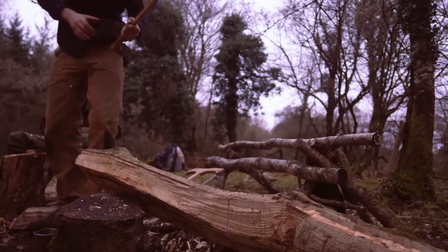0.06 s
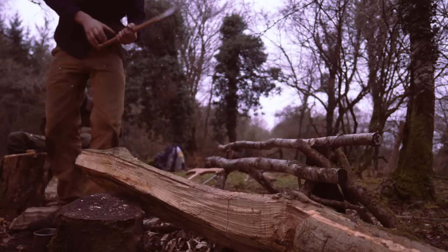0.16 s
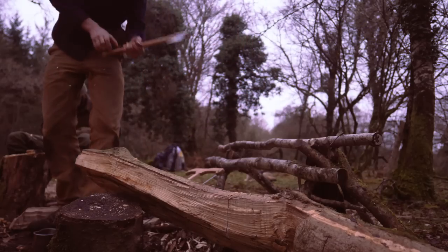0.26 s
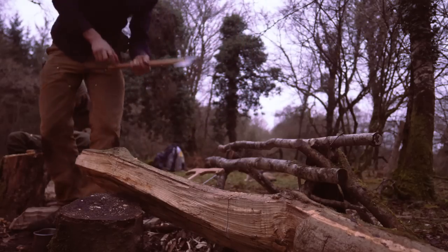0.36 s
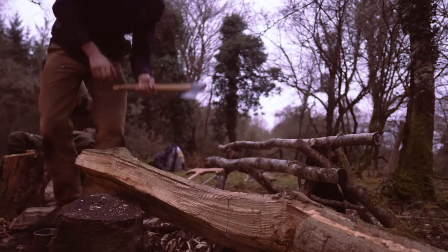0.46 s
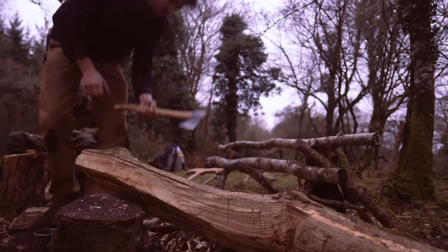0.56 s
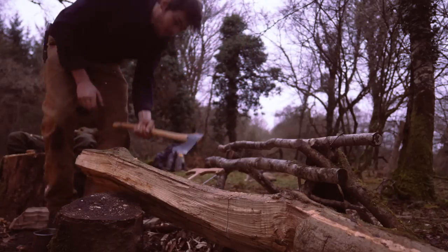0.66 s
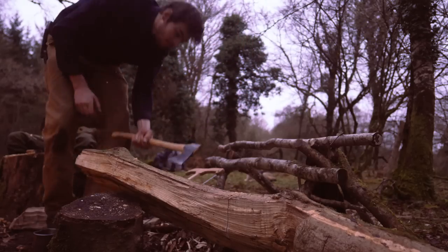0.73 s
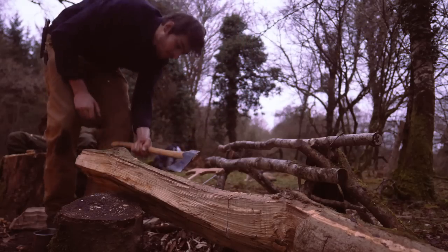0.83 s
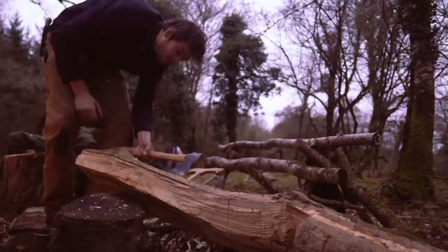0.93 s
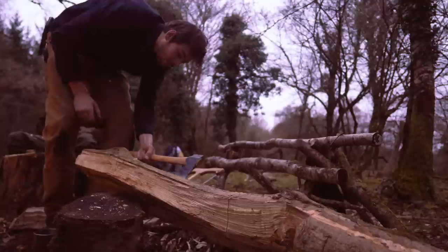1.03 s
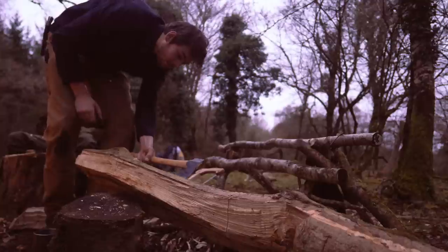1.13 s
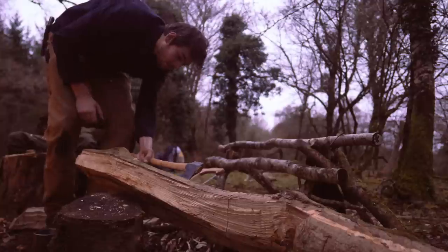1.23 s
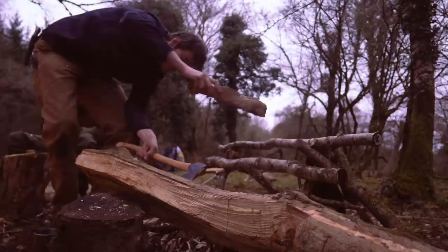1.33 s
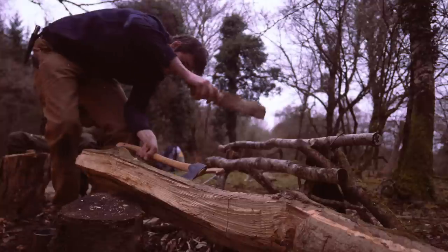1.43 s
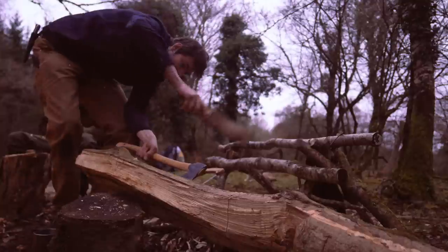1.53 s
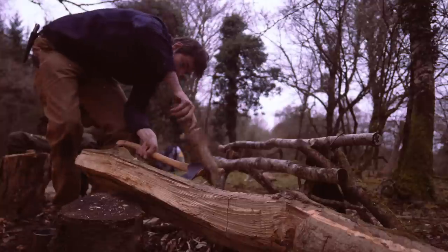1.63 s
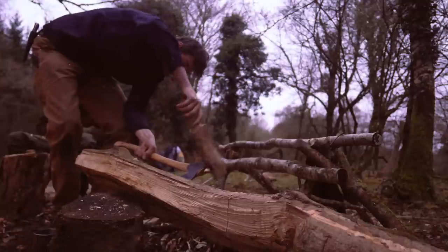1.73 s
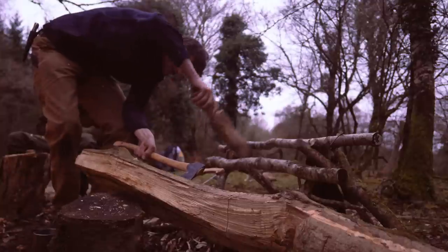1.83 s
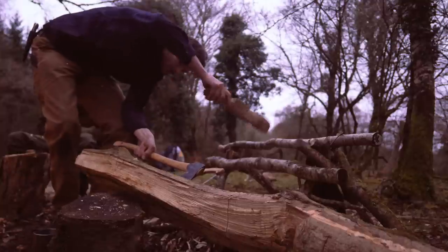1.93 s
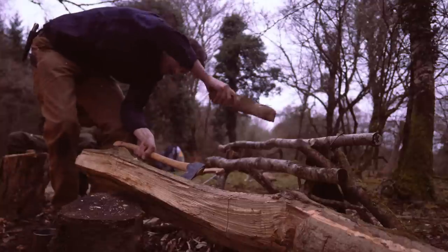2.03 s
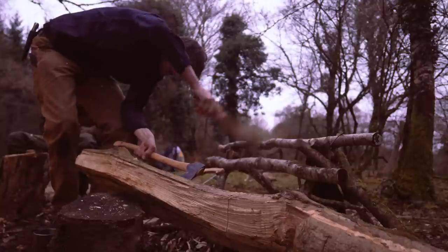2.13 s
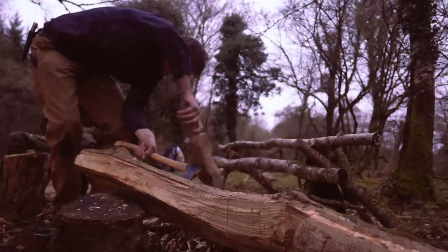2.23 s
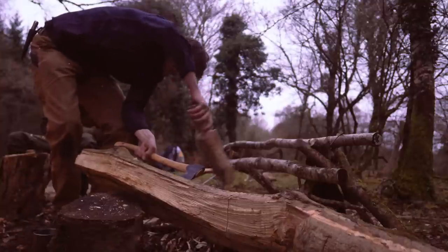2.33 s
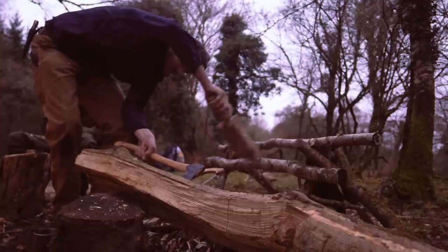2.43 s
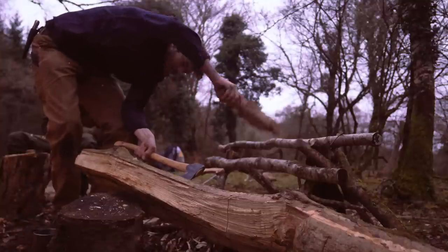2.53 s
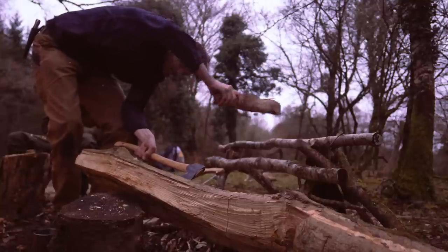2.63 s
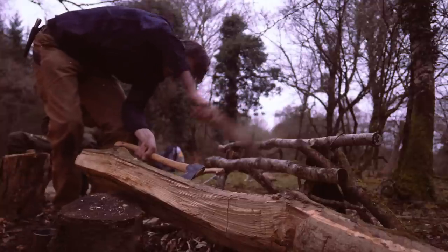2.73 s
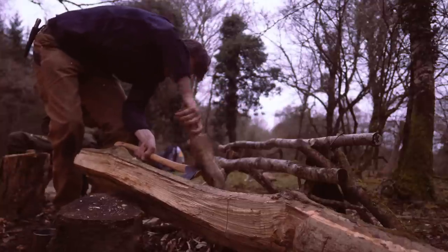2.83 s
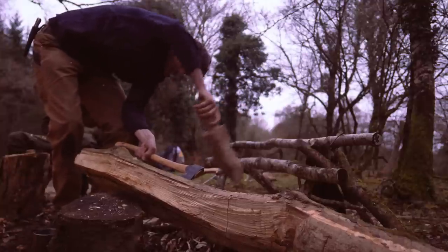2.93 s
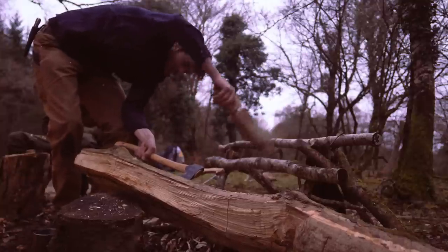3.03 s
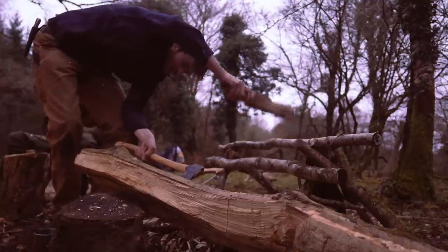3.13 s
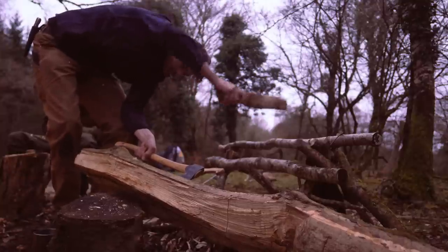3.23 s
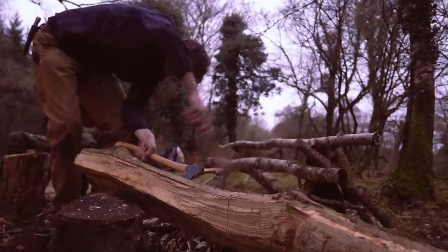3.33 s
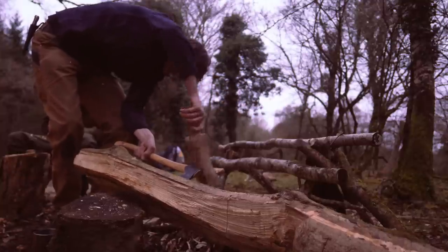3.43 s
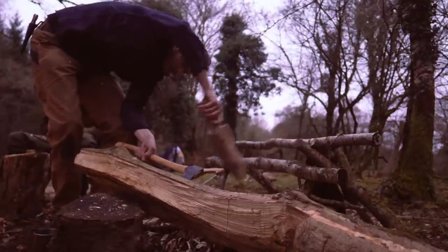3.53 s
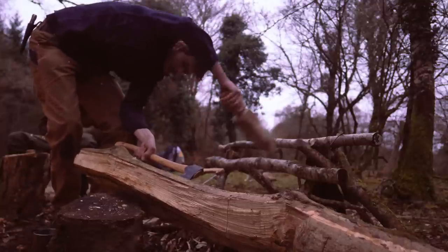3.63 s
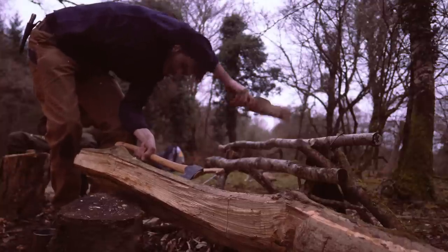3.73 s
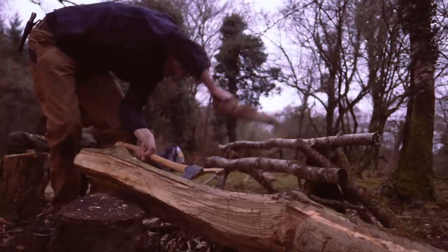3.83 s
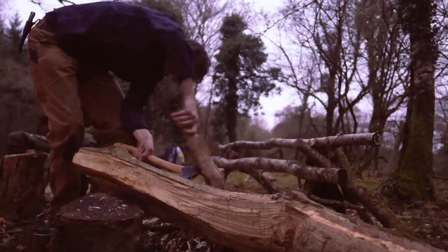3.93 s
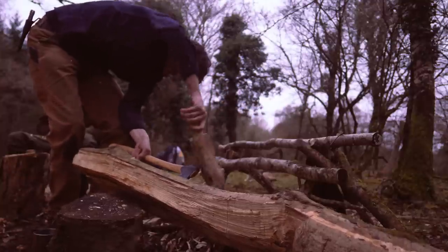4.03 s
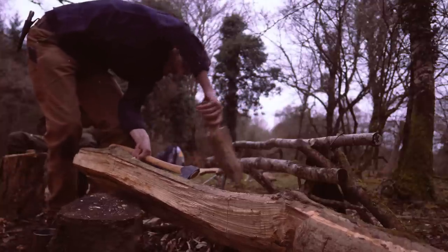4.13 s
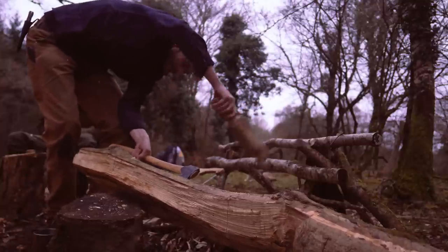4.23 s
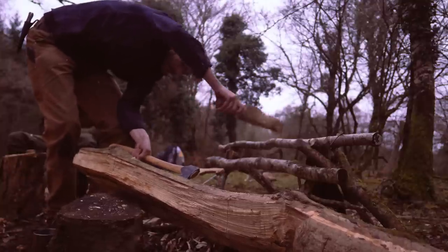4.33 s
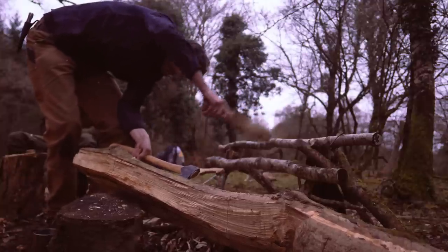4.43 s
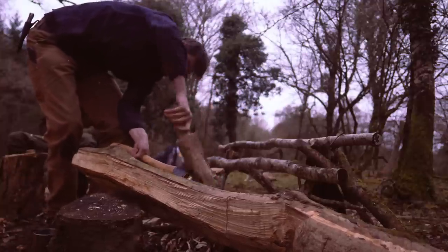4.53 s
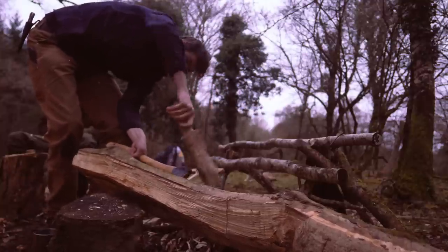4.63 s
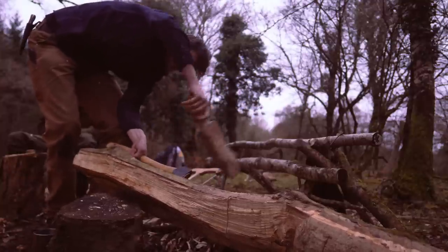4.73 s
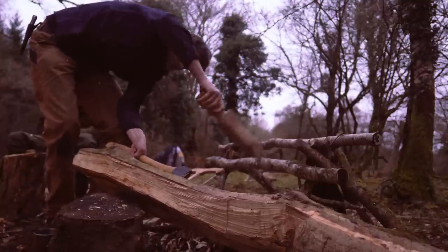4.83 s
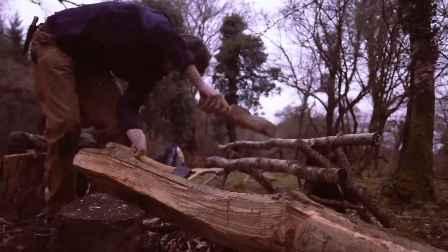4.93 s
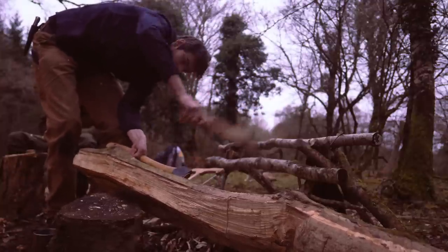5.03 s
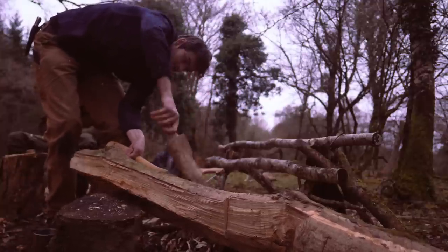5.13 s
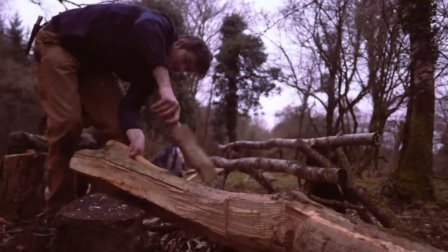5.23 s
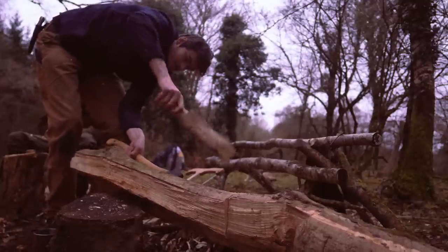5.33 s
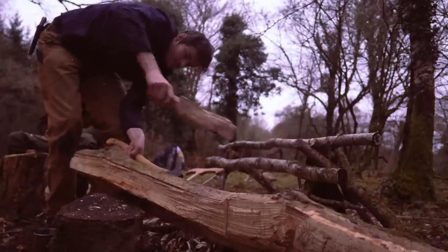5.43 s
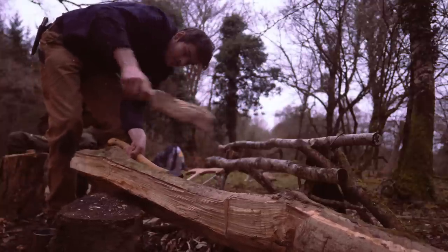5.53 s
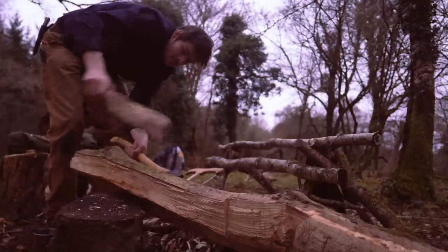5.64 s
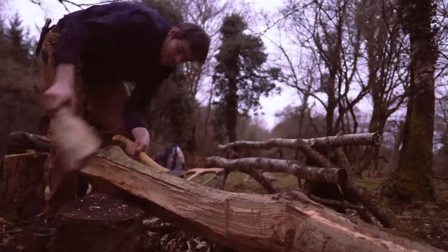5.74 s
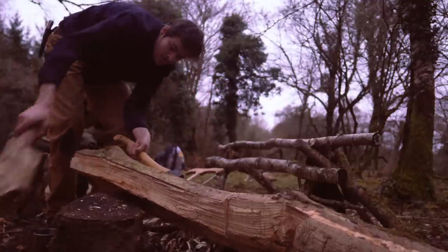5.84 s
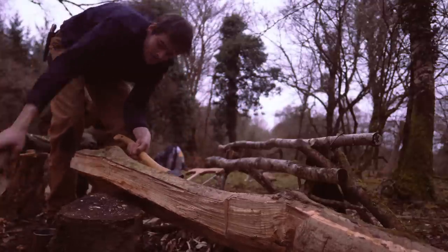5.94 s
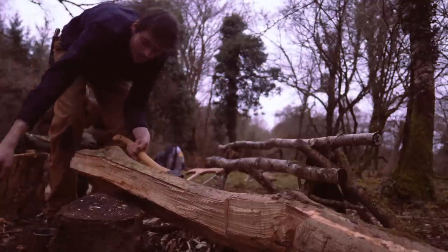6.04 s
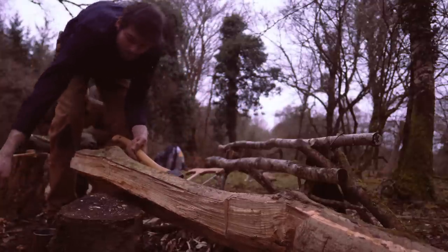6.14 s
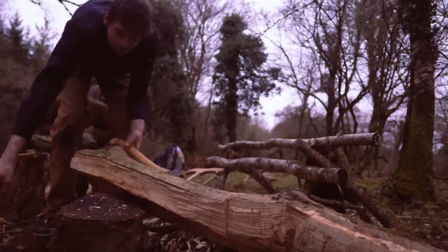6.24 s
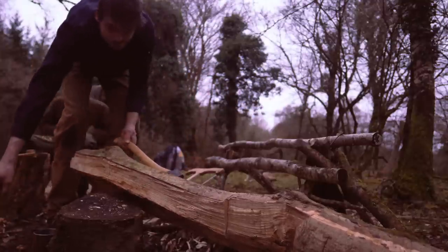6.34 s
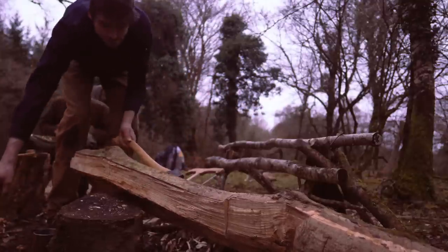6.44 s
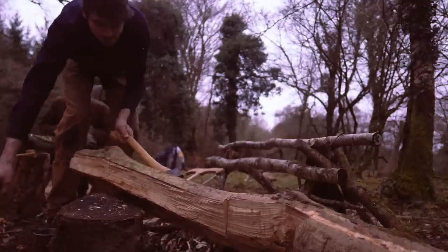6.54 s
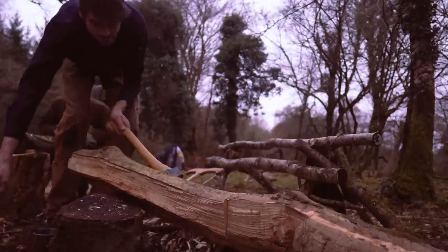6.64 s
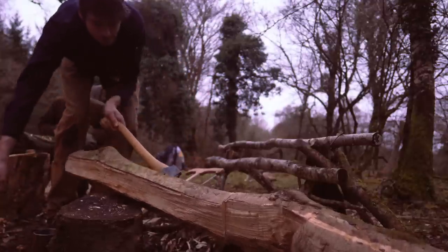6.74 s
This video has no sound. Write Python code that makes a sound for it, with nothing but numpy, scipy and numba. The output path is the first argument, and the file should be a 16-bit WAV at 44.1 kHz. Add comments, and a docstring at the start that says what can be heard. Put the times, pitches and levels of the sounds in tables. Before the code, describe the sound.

Close stereo microphones outdoors among trees: quiet wind and road hiss, faint clothing rubs and a dull thud before the first second ends. Seven loud, evenly paced mallet strikes follow, each a clipped woody crack with short log resonance, low ground thump and faint scattered echo. After the last, the background hiss returns with small shuffles and thuds, then a rapid bright rattle of hatchet head, handle and split wood.

```python
"""A bare winter wood: soft air and far road hiss, as swelling noise bands, lie under everything. First splinters
tick as noise snaps, boots and tools thud and cloth rubs as modulated grains. Then a wooden mallet drives a
hatchet into a log seven times: cracks, damped modes and late soil waves, with a few rebounds. Last the hatchet
is wrenched free in a clatter of steel, handle and split wood. The trunks scatter echoes throughout; a recorder
with close-set microphones clips the blows and its gain control ducks the hiss after each."""
import sys
import numpy as np
from scipy import signal
from scipy.fft import rfft, irfft, next_fast_len
from scipy.io import wavfile
from scipy.ndimage import uniform_filter1d, minimum_filter1d
from numba import njit

SR = 44100
rng = np.random.default_rng(int(sys.argv[2]) if len(sys.argv) > 2 else 0)


def wrap_up_sound(samples):
    """Save the sound to the file named by the first command line argument, as 16-bit audio."""
    columns = np.atleast_2d(samples).T
    # keep every value between -1 and 1, then stretch to whole-number steps
    tamed = np.clip(columns, -1, 1)
    steps = np.round(tamed * 32767).astype(np.int16)
    wavfile.write(sys.argv[1], SR, steps)


N = 298557
OPPOSITE = np.array([[1], [-1]])  # side signal: opposite sign left and right


def amp(db):
    """Level law: 20 dB is a factor of ten in amplitude."""
    return 10 ** (np.asarray(db) / 20)


def unit(x):
    """Normalisation to an rms of 1."""
    return x / np.sqrt(np.mean(x ** 2))


def on_log_hz(table, hz):
    """Spectral interpolation: values run straight between table points on a log-frequency axis."""
    f, v = np.transpose(table)
    return np.interp(np.log(np.maximum(hz, 1)), np.log(f), v)


def band(x, hz, octaves):
    """Band-pass filtering about a geometric centre."""
    edges = np.clip(hz * 2. ** np.array([-octaves / 2, octaves / 2]), 10, .47 * SR)
    return signal.sosfilt(signal.butter(2, edges, "bandpass", fs=SR, output="sos"), x)


def fade(t60, seconds, rise=0.000053):
    """Exponential damping: a quick rise, then a fall of 60 dB in t60 seconds."""
    t = np.arange(int(seconds * SR)) / SR
    attack = 1 - np.exp(-t / max(rise, 1e-5))
    return attack * np.exp(-np.log(1000) * t / max(t60, .002))


def ring(modes, scatter_db, spread, seconds=.3):
    """Modal synthesis: damped modes beat with weaker neighbours; each strike scatters level and pitch anew."""
    t = np.arange(int(seconds * SR)) / SR
    out = 0
    for (hz, db, t60), (a, b, c, d) in zip(modes, rng.standard_normal((len(modes), 4))):
        phase = 2 * np.pi * hz * t
        main = np.sin(phase * (1 + spread * b / 2))
        neighbour = amp(-6) * np.sign(d) * np.sin(phase * (1 + 2 * spread * c))
        level = amp(db + scatter_db * a) * np.sign(a * d)
        out = out + level * (main + neighbour) * fade(t60, seconds, 0.0011)
    return out


def dense(bands):
    """High modal density: modes too close to tell apart act as noise bands, each with its own decay."""
    return sum(amp(db) * unit(band(rng.standard_normal(SR // 4), hz, 1.0)) * fade(t60, .25, 0.00036)
               for hz, db, t60 in bands)


def burst(envelope, colour):
    """Spectral shaping: noise coloured by an (Hz, dB) table, rms 1 before the envelope is applied."""
    noise = rfft(rng.standard_normal(4096))
    shape = amp(on_log_hz(colour, np.fft.rfftfreq(4096, 1 / SR)))
    return unit(irfft(noise * shape))[:len(envelope)] * envelope


def add(out, s, x):
    """Superposition: adds a sound at s seconds."""
    i = int(s * SR)
    out[i:i + len(x)] += x[:N - i]


def walk(rate):
    """Slow random modulation: levels held 1 / rate seconds and smoothed twice, spread near 1."""
    k = int(SR / rate)
    steps = np.repeat(rng.standard_normal(N // k + 1), k)
    return 1.3 * uniform_filter1d(uniform_filter1d(steps, k), k)[:N]


# Colour of the air noise. Each row: frequency in Hz, relative level per Hz in dB.
AIR_COLOUR = [(15, -56), (25, 1), (161, -1.5), (217, -1), (256, -3), (394, -6), (659, -7.5), (775, -5),
              (1130, -4.5), (2000, -9), (3080, -13.5), (7710, -25.5), (10400, -34), (14000, -37.5),
              (16000, -52)]
# Stereo width of the air. Each row: frequency in Hz, side level against mid in dB.
AIR_WIDTH = [(60, -29.5), (110, -33), (200, -30), (380, -24), (700, -25.5), (1290, -31.5), (2380, -23),
             (4400, -17), (8120, -13.5), (15000, -3)]
# Swelling of the air. Each row: time in seconds, wind gain under 200 Hz in dB, hiss gain in dB.
AIR_SWELL = [(0, -3, -0.5), (.75, -3.5, -1.5), (1.1, -3.5, -4), (2.4, -1, -3), (3.6, -6, -6),
             (4.3, -0.7, -6), (4.9, -4.5, -7.5), (5.5, -4.5, -5.5), (5.8, -3, -6.5), (6, 2.5, -4),
             (6.22, -5, 0.8), (6.5, 0.5, -2.5), (6.77, 0, -4)]
AIR_DB = -43.5  # mid level before the swells
RUSTLE_DB, RUSTLE_SLOPE = 6, 0.93  # leaf rustle over 6 kHz follows the hiss (dB, dB per dB)


def air():
    """Band-wise modulation: octave bands of noise swell by region and flicker alone; the treble is widest."""
    s, *swell = np.transpose(AIR_SWELL)
    wind, hiss = (np.interp(np.arange(N) / SR, s, c) for c in swell)
    rustle = RUSTLE_DB + RUSTLE_SLOPE * hiss
    size = next_fast_len(N)
    f = np.fft.rfftfreq(size, 1 / SR)
    mid, side = (rfft(rng.standard_normal(size)) * amp(on_log_hz(AIR_COLOUR, f)) for _ in range(2))
    side = side * amp(on_log_hz(AIR_WIDTH, f))
    scale, out = amp(AIR_DB) / np.std(irfft(mid, size)), 0
    for k in range(10):
        centre = 32 * 2. ** k
        # triangular, overlapping octave bands
        share = np.clip(1 - np.abs(np.log2(np.maximum(f, 1) / centre)), 0, 1)
        if centre < 200:
            region_db = wind + 2.5 * walk(4)
        else:
            region_db = hiss if centre < 6000 else rustle
        db = region_db + 1.2 * walk(9)
        stereo = irfft(mid * share, size)[:N] + irfft(side * share, size)[:N] * OPPOSITE
        out = out + amp(db) * stereo
    return scale * out


# Echo of the trunks. Each row: band centre in Hz, decay t60 in seconds, level in dB.
TRUNK_ECHO = [(128.5, 0.63, -23.5), (319.5, 0.27, -45.5), (1000, .11, -44), (3000, .12, -48),
              (8000, .12, -48)]


def trees(x):
    """Diffuse scattering: convolution with decaying noise, unlike in mid and side; the bass lasts longest."""
    length = SR // 2
    echo = [sum(amp(db) * unit(band(rng.standard_normal(length), hz, 5.0))
                * fade(t60, .5, 0.004) / np.sqrt(t60 * SR)
                for hz, t60, db in TRUNK_ECHO) for _ in range(2)]
    mid, side = (signal.fftconvolve(x, e)[:N] for e in echo)
    return mid + amp(-36) * side * OPPOSITE


# Cloth, leather, bark and splintering, and a last bright hiss as the clatter dies away. Each row: start in
# seconds, end in seconds, resonance in Hz, width in octaves, level in dB before the swell.
RUBS = [(-.2, 0.46, 4670, 0.18, -56.5), (0, 0.402, 6300, 0.13, -62), (-.3, 0.555, 14000, 0.18, -60),
        (0, 0.48, 1520, 4.9, -55), (.06, 0.11, 500, 0.42, -47.5), (.765, .83, 6000, 1.2, -50),
        (4.584, 4.643, 9000, 3.3, -36.5), (5.161, 5.255, 6000, 3.1, -37.5),
        (4.174, 4.554, 1296, 0.27, -54.5), (5.965, 6.262, 1380, 0.16, -50),
        (6.187, 6.405, 8200, 0.2, -56.5), (6.196, 6.406, 12600, .4, -62), (6.255, 6.33, 775, 3.5, -45.5),
        (6.669, 6.846, 8000, 0.9, -40)]
RUB_SKEW = 0.5  # under 1: a rub swells faster than it fades


def rubbing():
    """Granular noise: dense uneven grains excite a resonance, swelling and fading raggedly."""
    out = np.zeros(N)
    for start, end, hz, octaves, db in RUBS:
        t = np.arange(max(start, 0) * SR, end * SR) / SR
        grains = rng.standard_normal(N) * amp(3 * rng.exponential(size=N) + 4 * walk(40) + 3 * walk(300))
        swell = np.sin(np.pi * np.clip((t - start) / (end - start), 0, 1) ** RUB_SKEW)
        add(out, max(start, 0), amp(db) * unit(band(grains[:len(t)], hz, octaves)) * swell)
    return out


# Boots and tools set down. Each row: start in seconds, level in dB, body pitch in Hz.
THUDS = [(.085, -54, 206), (.227, -53, 282), (.375, -40, 111), (.736, -43, 157), (0.764, -25.5, 105),
         (0.822, -31, 70), (0.875, -37, 70), (.888, -46.5, 278), (2.447, -44, 295), (5.345, -41.5, 254),
         (6.213, -32, 70), (6.244, -37, 70), (6.272, -32, 70), (6.283, -35.5, 204), (6.572, -34.5, 153)]
THUD_T60_S, KNOCK_RATIO = 0.09, 2.55  # body decay; knock centre over body pitch
KNOCK_DB, KNOCK_DB_PER_OCTAVE = -8, 10  # small things knock harder; octaves over 100 Hz


def boots():
    """Damped impact: one low swing of the body under a short, rough noise knock."""
    out, t = np.zeros(N), np.arange(SR // 5) / SR
    for s, db, hz in THUDS:
        body = np.sin(2 * np.pi * hz * t) * fade(THUD_T60_S, .2, 0.004)
        knock = unit(band(rng.standard_normal(len(t)), KNOCK_RATIO * hz, 1.0)) * fade(0.1, .2, 0.00097)
        knock_db = KNOCK_DB + KNOCK_DB_PER_OCTAVE * np.log2(hz / 100)
        add(out, s, amp(db) * (body + amp(knock_db) * knock))
    return out


# Splinters and twigs. Each row: start in seconds, relative body level in dB, relative snap level in dB,
# extra brightness in dB.
TICKS = [(0.375, -39, -53, 5), (.2265, -38.5, -60, 0), (.388, -36, -56, -1), (0.4964, -52, -47.5, 0),
         (0.7757, -44, -48, -1), (0.788, -41.5, -45, -7), (.9764, -76, -58, 10.5), (1.956, -57, -55, 4.5),
         (2.34, -30, -30, 4), (3.3375, -51, -48, 2.5), (4.288, -59, -65, 11), (4.3085, -40.5, -64, -12),
         (4.568, -39, -53.5, 17.5), (4.6062, -31, -40.5, 6), (4.6253, -40, -62, 8), (4.739, -44, -44.5, -2),
         (4.9224, -53, -64.5, 13), (5.018, -48, -55, 20.5), (5.1876, -16.5, -21.5, -3.5),
         (5.202, -47, -36, -11), (5.211, -30, -34.5, -5), (5.321, -44, -38.5, -1), (5.8754, -53, -57.5, 6),
         (6.1075, -50, -55, -2), (6.19, -26, -49, -24), (6.4867, -53, -50, -3), (6.5734, -48, -64, 16.5)]
TICK_T60_S, BRIGHT_DB, AIRY_DB = 0.031, 1.5, -4  # decay; the two treble bands against the snap


def splinters():
    """Brittle fracture: a sudden release heard as a noise snap in four bands, some fuller, some brighter."""
    out = np.zeros(N)
    for s, body_db, db, extra_db in TICKS:
        bands = [(1000, 2.16, body_db + 4.5), (4430, 0.39, db + 5),
                 (8150, 0.26, db + extra_db + BRIGHT_DB), (13200, 0.17, db + extra_db + AIRY_DB)]
        snap = sum(amp(level_db) * unit(band(rng.standard_normal(SR // 12), hz, octaves))
                   for hz, octaves, level_db in bands)
        add(out, s, snap * fade(TICK_T60_S, 1 / 12))
    return out


# Knocks as the hatchet comes free. Each row: start in seconds, relative steel level in dB, grit centre in Hz,
# handle level in dB, split wood level in dB.
CLATTER = [(6.6575, -20, 8260, -27, -39), (6.6617, -11, 8000, -12, -22.5), (6.6829, -16, 8210, -8.5, -12.5),
           (6.6986, 0.5, 5400, -11.5, -27), (6.703, -21, 7140, -10, -10), (6.7058, -9, 7310, -22, -7),
           (6.7165, 0.5, 3950, -6.5, -23)]
# Modes of the steel head, the handle and the split wood. Each row: frequency in Hz, relative level in dB,
# decay t60 in seconds.
STEEL_MODES = [(3950, -14, .035), (4500, -13, .022), (5400, -11, .018), (7500, -14, .03), (8500, -13, .018),
               (11500, -21, .012), (13500, -21, .012)]
HANDLE_MODES = [(1083, -6.5, 0.07), (1260, 6, 0.011), (950, -12, 0.021), (1725, -16, 0.071),
                (2150, -8, 0.028)]
SPLIT_MODES = [(348, -8, 0.087), (466, -2.5, 0.018), (589, -4.5, 0.092), (766, -12.5, 0.1)]
# Wood modes too dense to tell apart, also played by the mallet. Each row: band centre in Hz,
# relative level in dB, decay t60 in seconds.
WOOD_BANDS = [(180, -6, .085), (315, -10, .085), (604, -5, .075), (930, -3, .08), (1400, -5, .045),
              (2600, -8, .018)]
STEEL_DB_PER_OCTAVE = -8  # steel modes away from the grit centre
GRIT_DB, SPLIT_DENSE_DB = -1.5, -11  # grit against the steel, dense against clear modes of the split wood


def hatchet():
    """Selective modal excitation: each knock favours steel modes near one pitch, with handle, wood and grit."""
    out = np.zeros(N)
    for s, steel_db, hz, handle_db, split_db in CLATTER:
        colour = [(400, -20), (1500, -16), (0.63 * hz, -13), (hz, -2), (1.2 * hz, -11), (15000, -15)]
        grit_envelope = fade(0.009, .09, 0.0003) + amp(-24) * fade(.15, .09)
        add(out, s, amp(steel_db + GRIT_DB) * burst(grit_envelope, colour))
        steel = [(f, db + STEEL_DB_PER_OCTAVE * abs(np.log2(f / hz)), t60) for f, db, t60 in STEEL_MODES]
        head = amp(steel_db + 3) * ring(steel, 2.5, .02)
        add(out, s, head + amp(handle_db) * ring(HANDLE_MODES, 1.5, .015))
        add(out, s, amp(split_db) * ring(SPLIT_MODES, 1.6, 0.044))
        add(out, s, amp(split_db + SPLIT_DENSE_DB) * dense(WOOD_BANDS[2:]))
    return out


# Late waves in the soil. Each row: delay in seconds, frequency in Hz, relative level in dB,
# half length in seconds (fall to 1/e).
SOIL_WAVES = [(0.069, 39, 3, 0.018), (0.138, 46.6, -1, 0.041), (.23, 45, -3.5, .022),
              (0.33, 35.6, -16, 0.035)]


def ground():
    """Slow wave propagation in soil: a few low Gaussian packets arrive late, alike after every blow."""
    t = np.arange(SR // 2) / SR
    return sum(amp(db) * np.sin(2 * np.pi * hz * (t - s)) * np.exp(-((t - s) / half) ** 2)
               for s, hz, db, half in SOIL_WAVES)


# Mallet blows and rebounds. Each row: start in seconds, strength in dB, crack level in dB, mallet reference
# pitch in Hz, mallet decay t60 in seconds, place along the log from 0 to 1, low log modes in dB,
# upper log modes in dB, jolt in dB.
BLOWS = [(1.6741, -5, -6.5, 898, 0.0096, 0.32, -8.5, -13.5, -33),
         (2.265, -7.5, 4, 1100, 0.012, 0.1, -9.5, -8.5, -13),
         (2.311, -15, -42, 630, 0.014, .22, -20, -19, -42.5),
         (2.8523, -4, 0.5, 940, 0.011, 0.59, -13.5, -15.5, -14),
         (3.4223, -7, 0.5, 535, 0.011, 0.2, -16, -25, -20),
         (3.4413, -21.5, -45, 580, 0.026, 1, -20, -26, -38),
         (3.446, -12.5, -27, 1304, 0.016, 0.2, -17.5, -26, -32),
         (3.4566, -21, -32, 1056, 0.025, 0.18, -24, -22.5, -23),
         (3.9928, -7.5, 0.5, 1368, 0.017, 0.48, -18.5, -1, -36),
         (4.5843, -9.5, -4.5, 1400, 0.029, 0.17, -14, -22, -23.5),
         (5.1654, -3, -8, 830, 0.0074, 0.07, -7, -4, -30)]
# Partials of the mallet. Each row: share of the reference pitch, relative level in dB.
MALLET_PARTIALS = [(0.97, 15.5), (1.77, 13.5), (0.669, 8)]
# Modes of the log, and of its jolt on the soil. Each row: frequency in Hz, relative level in dB,
# decay t60 in seconds.
LOG_MODES = [(260, 2, .15), (348, 1, .11), (520, 2, .105), (750, -5, .045), (1050, -8, .04),
             (1330, -10, .035)]
JOLT_MODES = [(103.7, 6, 0.062), (166, 6.5, 0.055), (196, 7.5, 0.037)]
# Colour of the crack. Each row: frequency in Hz, relative level per Hz in dB.
CRACK_COLOUR = [(880, -1.5), (1500, 1), (2100, -4.5), (2800, -2), (6240, -19), (8660, -9), (10100, -30.5),
                (13100, -13.5), (16000, -65)]
MALLET_DB, WOOD_DB = 3, -3  # against the strength
TAIL_DB = -24  # crack tail against the mean of strength and crack level
SOIL_DB, SOIL_PER_JOLT = -25.5, 0.29  # soil waves grow with half the strength and slowly with the jolt (dB per dB)
CONTACT_S, SOFTENING = .0004, 0.43  # push of a 0 dB blow; weaker ones push longer (dB per dB)
CRACK_LATE_S = 0.00072  # fibres give way late
LOW_CUT_HZ = 105  # low cut of the struck wood, keeps its knock free of rumble


def mallet():
    """Impact excitation: a contact pulse smooths the mallet and log modes; a crack and soil waves join it."""
    out, t = np.zeros(N), np.arange(SR // 4) / SR
    for s, db, crack_db, hz, t60, place, log_db, upper_db, jolt_db in BLOWS:
        tail = amp((db + crack_db) / 2 + TAIL_DB) * fade(0.091, .07)
        crack_envelope = amp(crack_db) * fade(0.0096, .07, 0.00013) + tail
        add(out, s + CRACK_LATE_S, burst(crack_envelope, CRACK_COLOUR))
        partials = sum(amp(part_db) * np.sin(2 * np.pi * share * hz * t) for share, part_db in MALLET_PARTIALS)
        knock = -partials * fade(t60, 1 / 4, 0.00054)
        # a blow on a node of one of the three low modes leaves it nearly silent
        mode_shape = np.abs(np.sin(np.pi * place * np.arange(1, 4)))
        low_db = log_db + 20 * np.log10(mode_shape + .03)
        blow_levels = [*low_db] + [upper_db] * len(LOG_MODES)
        struck = [(f, mode_db + blow_db, decay)
                  for (f, mode_db, decay), blow_db in zip(LOG_MODES, blow_levels)]
        log = ring(struck, 1.5, .02, .25) + amp(jolt_db) * ring(JOLT_MODES, 1.5, .06, .25)
        push = np.hanning(int(CONTACT_S * amp(-SOFTENING * db) * SR) + 3)
        body = amp(db + MALLET_DB) * knock[:len(log)] + log + amp(db + WOOD_DB) * dense(WOOD_BANDS)
        body = signal.sosfilt(signal.butter(2, LOW_CUT_HZ, "highpass", fs=SR, output="sos"), body)
        add(out, s, np.convolve(body, push / push.sum()))
        add(out, s, amp(SOIL_DB + db / 2 + SOIL_PER_JOLT * jolt_db) * ground())
    return out


def scene():
    """Superposition: near sources with a slight stereo difference, their echo, and the air."""
    near = mallet() + splinters() + boots() + hatchet() + rubbing()
    # the two microphones hear near sounds a little apart, the treble most
    late = amp(-51.5) * np.roll(near, 30)
    treble = amp(-27.5) * band(np.roll(near, 3), 11000., 2.0)
    return near + (late + treble) * OPPOSITE + trees(near) + air()


@njit
def follow(x, attack, release):
    """Envelope following: one-pole smoothing with separate rates for rise and fall."""
    out, e = np.empty(len(x)), 0.
    for i in range(len(x)):
        e += (x[i] - e) * (attack if x[i] > e else release)
        out[i] = e
    return out


KNEE_DB, SQUEEZE = -20, .62  # gain control: knee level, exponent of the reduction
SENSE_S, REACT_S, HOLD_S, RELEASE_S = 0.014, 0.0066, .1, .07
CLIP, TOP_HZ = 1, 16200  # full scale; upper cutoff


def record(dry):
    """Dynamic compression: gain reacts a few ms late, so blows clip first; it holds, recovers; the top is cut."""
    loud = follow(np.abs(dry).max(axis=0), 1 / (SENSE_S * SR), 1 / (SENSE_S * SR))
    hold = int(HOLD_S * SR)
    held = -minimum_filter1d(-loud, hold, origin=(hold - 1) // 2)  # running maximum
    gain = (1 + follow(held, 1., 1 / (RELEASE_S * SR)) / amp(KNEE_DB)) ** -SQUEEZE
    gain = signal.lfilter([1 / (REACT_S * SR)], [1, 1 / (REACT_S * SR) - 1], gain - 1) + 1
    clipped = np.clip(dry * gain, -CLIP, CLIP)
    return signal.sosfilt(signal.ellip(10, .2, 90, TOP_HZ, fs=SR, output="sos"), clipped)


dry = scene()
out = record(dry)
wrap_up_sound(out)
```